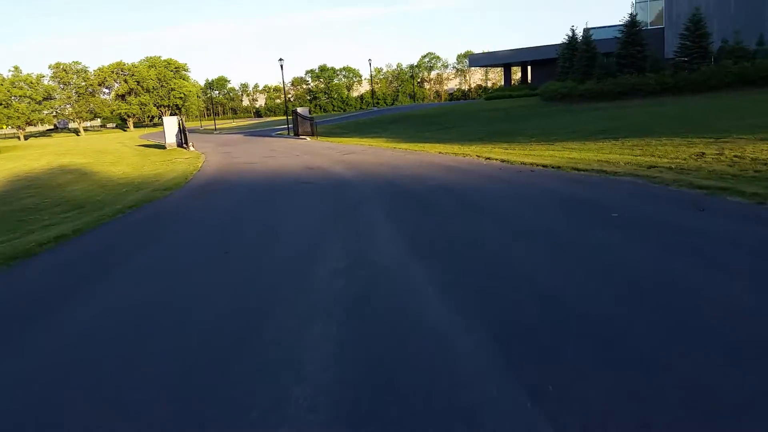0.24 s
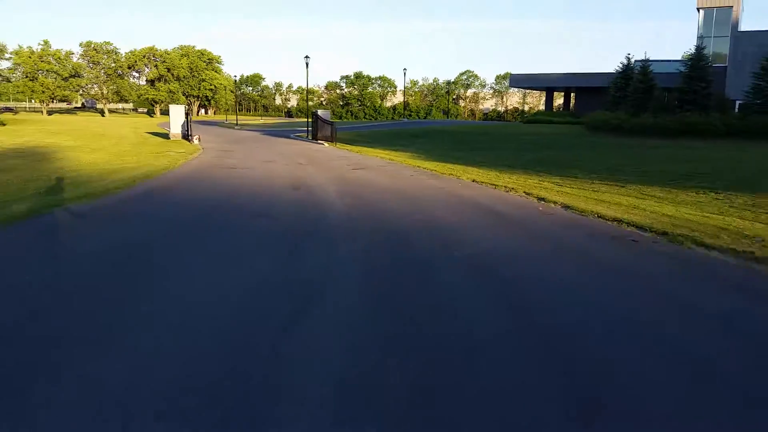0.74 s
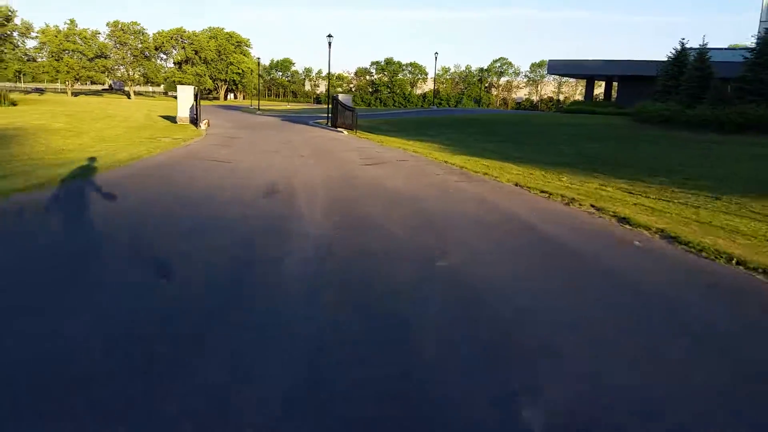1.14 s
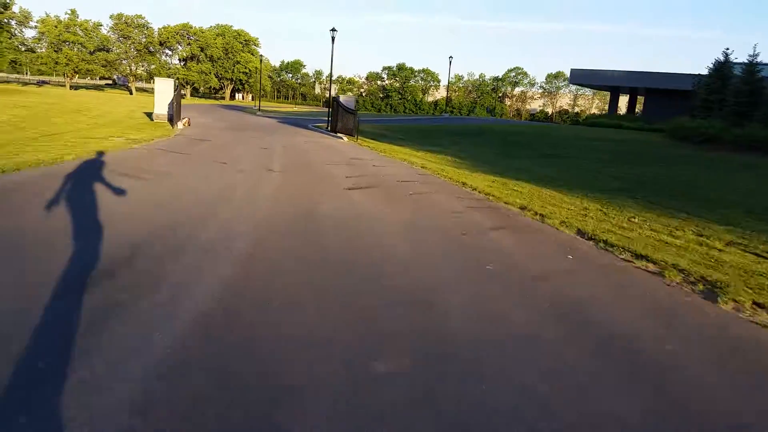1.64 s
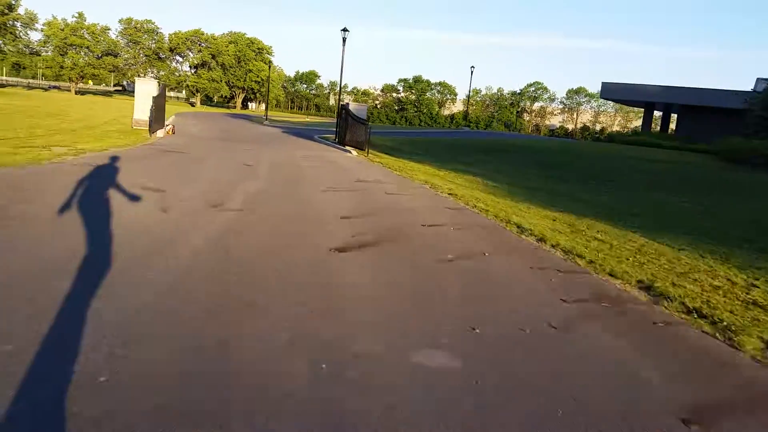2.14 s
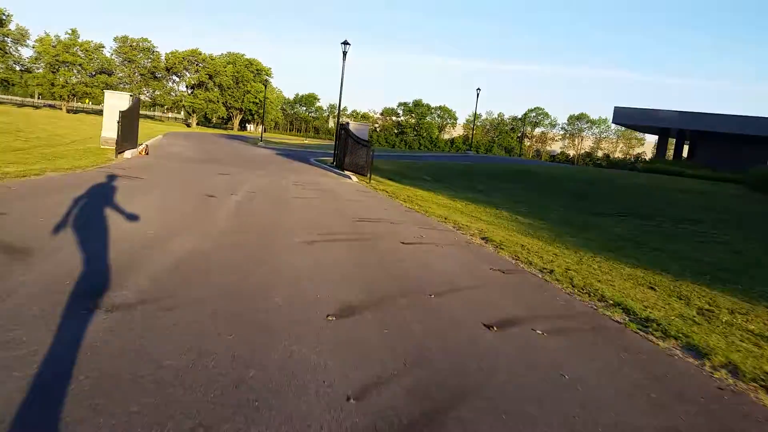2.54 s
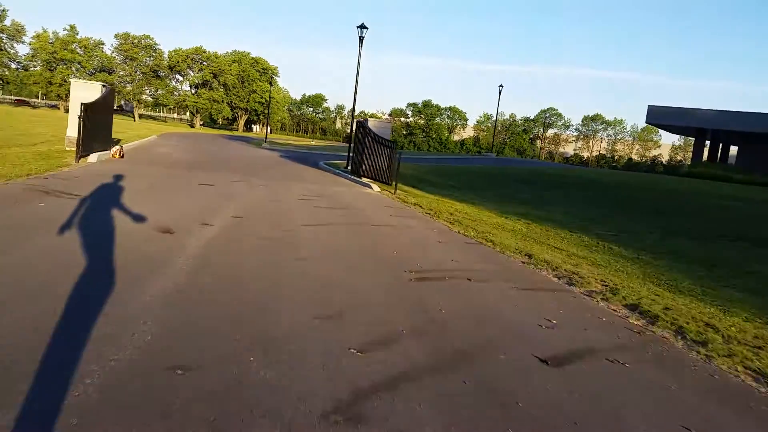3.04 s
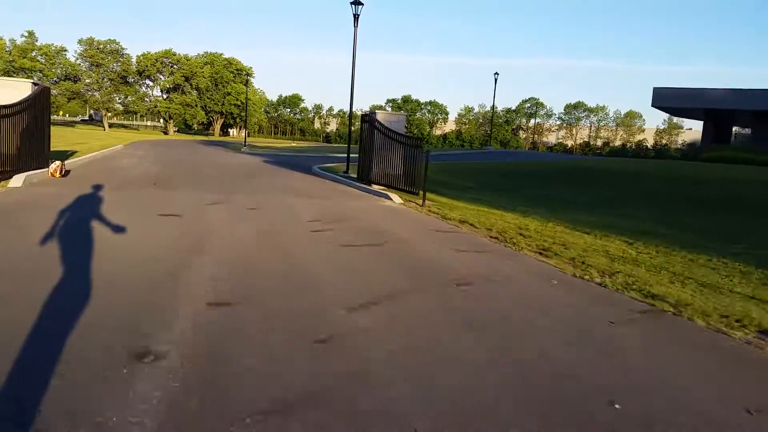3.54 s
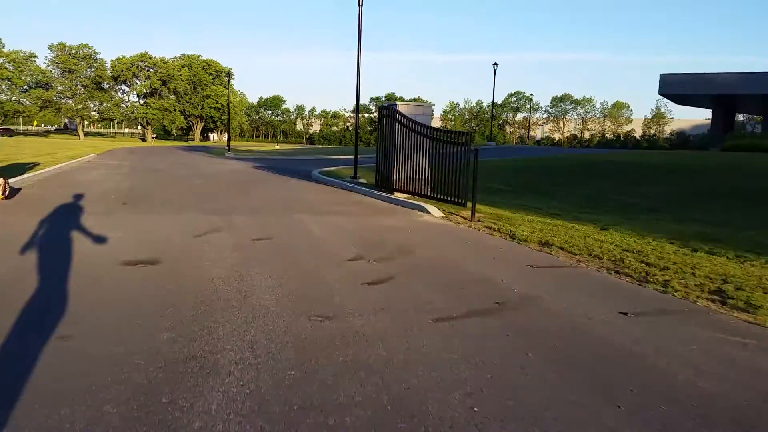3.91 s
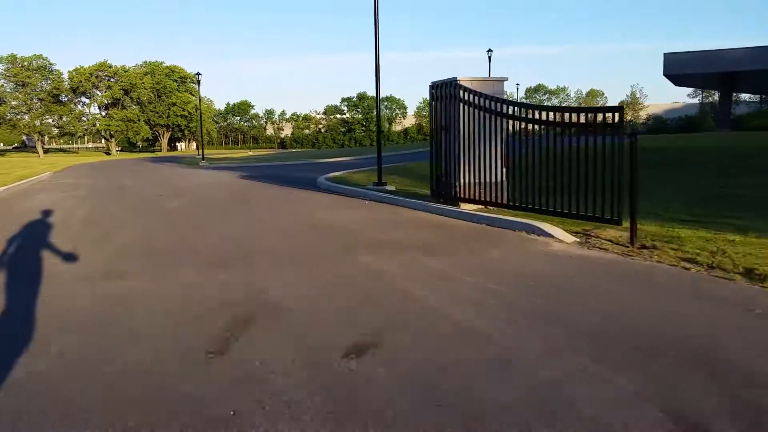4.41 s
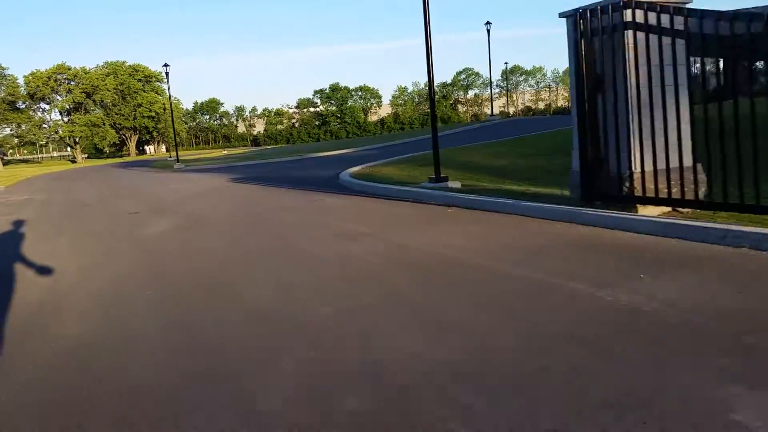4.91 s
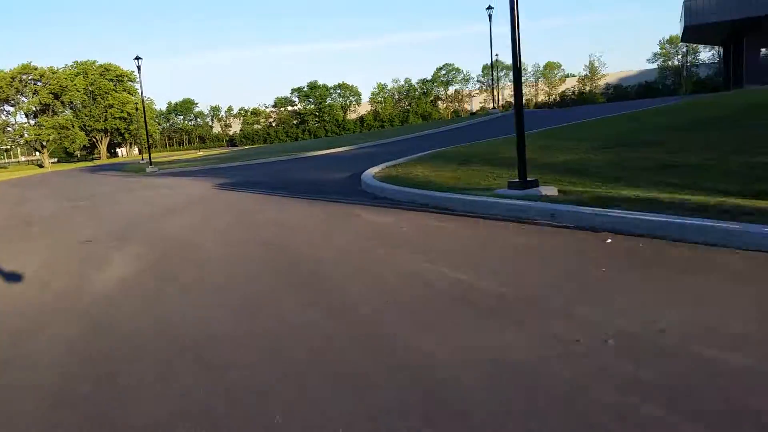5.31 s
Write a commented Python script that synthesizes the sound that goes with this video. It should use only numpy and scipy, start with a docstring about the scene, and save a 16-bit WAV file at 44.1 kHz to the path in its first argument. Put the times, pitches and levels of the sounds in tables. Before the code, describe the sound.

A longboard coasts along an outdoor asphalt drive, heard from a microphone carried by the rider. Loud wind dominates with low rumble, rasping gusts and crackling pops, shifting toward the left halfway and swelling near the end. The wheels make a continuous gritty roar underneath, with a hollow ring from the deck, easing slightly late on. A few faint, high bird whistles come in two small groups.

```python
"""A smooth asphalt drive: a longboard coasts down it, the rider carrying a camera.
Wind buffets both microphone ports, rasps in gusts, hisses over the rims, pops, and locks into deep
throbs and drones; the right port falls into the lee halfway. Underneath, the wheels roar and whine
on the grit and ring the deck. Birds whistle from the trees."""
import sys
import numpy as np
from scipy import signal
from scipy.fft import rfft, irfft, next_fast_len
from scipy.io import wavfile
from scipy.ndimage import uniform_filter1d, minimum_filter1d

SR = 44100
rng = np.random.default_rng(int(sys.argv[2]) if len(sys.argv) > 2 else 0)


def generate_wav(sig):
    """Save sig (samples, or channels by samples) to the path in sys.argv[1] as 16-bit PCM at SR."""
    pcm = np.round(np.clip(np.atleast_2d(sig).T, -1, 1) * 32767).astype(np.int16)
    wavfile.write(sys.argv[1], SR, pcm)


N = 245181
TIME_S = np.arange(N) / SR

# Headwind at the exposed left port: time_s, level_db
HEADWIND = [(0.0, -15), (0.75, -17), (0.9, -13.5), (1.4, -13.5), (2.15, -12), (2.32, -11), (2.5, -12.5),
            (2.8, -13), (3.25, -12), (3.55, -12.5), (4.0, -11), (4.12, -12.5), (4.28, -11.5), (4.42, -11),
            (4.62, -9.5), (4.92, -8), (5.22, -11), (5.42, -11), (5.56, -12)]
# Flow roughness, extra level of the small eddies: time_s, rasp_db
ROUGHNESS = [(0.0, -0.5), (0.7, -2), (0.98, 0), (1.2, -3), (1.45, -1), (1.5, 3), (1.65, 1.5), (2.42, 1.5),
             (2.75, -4), (3.05, -4), (3.4, -9.5), (4.3, -4.5), (4.9, -8), (5.25, -4.5), (5.56, -3.5)]
# Shelter of the right port, relative to the left: time_s, buffet_loss_db, rasp_gain_db
RIGHT_LEE = [(0.0, -1.5, -5), (1.75, -2, -5.5), (2.35, 0, -10), (2.47, 1.5, -10), (2.52, 3, -13.5),
             (2.75, 6.5, -5.5), (4.55, 10, -11.5), (5.08, 18, 0), (5.56, 10, -10)]
# Buffet spectrum per port: freq_hz, relative_density_db
WIND_SPECTRUM_LEFT = [(20, -23.5), (42, -17), (70, 0), (120, -2), (200, -7), (320, -12.5), (460, -14),
                      (650, -23), (1000, -24.5), (1500, -34.5), (2250, -38.5), (3000, -51), (4200, -62.5),
                      (5000, -72.5)]
WIND_SPECTRUM_RIGHT = [(20, -5), (42, -6.5), (70, -3.5), (120, -0.5), (220, -3.5), (320, -6.5), (460, -6),
                       (650, -15), (1000, -22.5), (1500, -28), (2200, -58), (3000, -69.5), (4200, -72.5),
                       (5500, -78)]
# Air over the rims, before port gains: time_s, level_db
HISS_LEVEL = [(0.04, -53.5), (0.38, -56), (1.38, -54), (1.98, -58.5), (2.21, -56), (2.46, -57.5),
              (2.52, -62.5), (2.7, -61), (2.73, -65.5), (3.76, -57), (3.79, -51.5), (3.82, -55.5),
              (4.51, -51), (4.74, -52), (4.8, -57.5), (5.22, -51.5), (5.56, -57)]
# Hiss spectrum with each port's resonances: freq_hz, relative_density_db
RIM_SPECTRUM_LEFT = [(1500, -8), (4200, -3), (5200, -11), (6100, -8.5), (6900, -7), (7700, 0), (8800, -7.5),
                     (10300, -8.5), (12200, -.5), (13500, -5.5), (15800, -4)]
RIM_SPECTRUM_RIGHT = [(1500, -3), (3200, -4), (5200, -15), (7700, -18), (9000, -25), (10300, -22),
                      (12200, -7.5), (13500, -6.5), (14500, -3), (15800, 5)]
# Wheel roar on asphalt: time_s, level_db
ROAR_LEVEL = [(0, -26.5), (1.3, -21.5), (2.3, -28), (2.7, -28.5), (4.2, -26.5), (5.0, -33.5), (5.56, -30.5)]
# Roar spectrum with deck resonances: freq_hz, relative_density_db
ROAR_SPECTRUM = [(70, -25), (135, 3.5), (220, -5.5), (330, -3.5), (432, -7), (560, -3), (700, -14.5),
                 (1120, -15), (1450, -26.5), (1900, -26.5), (2300, -24.5), (3000, -47.5), (4200, -42),
                 (5000, -55)]
# Hollow deck ring, varying with the surface: time_s, level_db
DECK_RING_LEVEL = [(0, -27), (.42, -32.5), (.6, -21), (1.0, -37.5), (1.28, -18.5), (1.5, -29.5),
                   (2.0, -28.5), (2.3, -27.5), (2.65, -31), (3.15, -27.5), (3.55, -32), (3.85, -27),
                   (4.25, -29), (4.55, -42), (5.05, -39), (5.25, -30.5), (5.56, -50)]
# Wheel whine, sinking in pitch, singing out in the turn: time_s, pitch_hz, level_db
WHEEL_WHINE = [(0, 1213, -46), (.55, 1125, -41.5), (1.6, 1054, -44), (2.7, 990, -54), (3.35, 924, -40),
               (4.1, 896, -38), (4.7, 930, -45), (5.56, 907, -59)]
# Higher ring in the turn: time_s, level_db
HIGH_RING_LEVEL = [(3.1, -75), (3.7, -59), (4.5, -53), (5.0, -70)]
# Strong eddy bursts: start_s, level_db, centre_hz, rattle_decay_s, left_minus_right_db
EDDY_BURSTS = [(0.161, -21, 900, .022, 22), (0.717, -33, 500, .003, 4), (0.85, -21, 650, .004, 20),
               (0.871, -26.5, 806, .004, -4), (.945, -17, 450, .004, -15), (1.019, -25, 700, .014, 14),
               (1.077, -27.5, 950, .005, 20), (1.287, -26.5, 900, .003, 24), (1.313, -19, 750, .006, 18),
               (1.488, -24, 850, .05, 20), (1.518, -27, 1250, .012, 14), (1.685, -29, 1200, .004, 16),
               (1.722, -21, 450, .003, -3), (1.771, -24, 950, .004, 22), (1.892, -33.5, 1000, .004, 16),
               (2.057, -26, 1200, .006, 21), (2.142, -23, 1300, .006, 19), (2.257, -26.5, 750, .004, 0),
               (2.347, -21, 900, .005, 20), (2.381, -23, 950, .016, 22), (2.428, -21, 900, .005, 20),
               (2.508, -27, 700, .003, 26), (2.541, -24, 950, .03, 24), (2.571, -23, 1050, .014, 23),
               (2.669, -21, 700, 0.022, 17), (2.845, -29, 650, .003, 14), (2.861, -27.5, 1090, 0.049, 22),
               (3.057, -24, 550, .003, 16), (3.095, -27, 500, .003, 15), (3.157, -25.5, 1000, .003, 28),
               (4.74, -21.5, 990, .003, 29), (4.752, -25, 700, .02, 28), (4.862, -19, 450, .005, 19),
               (4.902, -25, 500, .003, 17), (5.038, -16, 550, .003, 29), (5.07, -15, 430, .003, 25),
               (5.095, -24, 750, .003, 25), (5.102, -21, 1050, .005, 27), (5.135, -21, 600, .015, 23),
               (5.232, -37, 1100, .003, 24), (5.278, -27, 700, .004, 20), (5.418, -24, 850, .016, 28),
               (5.453, -37, 1050, .003, 27), (5.492, -23, 950, .005, 26), (5.502, -24.5, 1000, .025, 27)]
# Locked vortex shedding: start_s, length_s, start_hz, end_hz, peak_db, left_minus_right_db
VORTEX_TONES = [(.59, 0.099, 145.6, 135, -14, -1), (.85, 0.13, 133, 118.4, -19.5, 5.5),
                (.98, 0.14, 119.4, 136, -10, 14), (1.62, .14, 150, 137.6, -9, 12),
                (1.81, 0.082, 138, 143, -8.5, 9), (2.211, 0.2, 84.2, 55.4, -13.5, 11),
                (2.25, 0.11, 99.7, 114, -13, 2.5), (2.53, 0.12, 139.4, 123.4, -12, 9),
                (2.605, 0.19, 73.7, 76.7, -9.5, 22), (2.834, 0.17, 85, 94, -12, 19),
                (3.8, 0.28, 90.9, 127.6, -12.5, 17), (4.56, 0.1, 164.3, 145, -16, 20),
                (4.559, 0.25, 93.3, 85.9, -11.5, 24), (4.739, 0.437, 79.8, 69, -10.5, 24),
                (5.328, 0.16, 107, 114.4, -15.5, 16), (5.417, 0.19, 78, 74.6, -13, 24)]
# Bird whistles: start_s, length_s, start_hz, middle_hz, end_hz, level_db, accent_fraction
BIRD_NOTES = [(0.703, .24, 3800, 3400, 3250, -67, .3), (0.763, .055, 4650, 4330, 4050, -56, .55),
              (0.798, 0.36, 4080, 3500, 3200, -55, 0.64), (1.325, .04, 4250, 4100, 3980, -59, .5),
              (1.355, 0.109, 3990, 3780, 3700, -58, .4), (2.895, .06, 6800, 6550, 6500, -73, 0.6),
              (3.02, .135, 5300, 4900, 4880, -64.5, .6), (3.13, .105, 4880, 4940, 5120, -60, 0.3),
              (3.594, .07, 4200, 3880, 3680, -60, 0.2)]


def from_db(db):
    """Decibels to gain."""
    return 10 ** (np.asarray(db) / 20)


def unit_rms(x):
    """Scale to rms 1."""
    return x / np.sqrt(np.mean(x ** 2) + 1e-20)


def curves(table):
    """Value columns of a time table, interpolated per sample."""
    time_s, *columns = np.transpose(table)
    return [np.interp(TIME_S, time_s, column) for column in columns]


def pan_gains(pan_db):
    """Left and right gains of mean 1 for a level difference."""
    gains = from_db([[pan_db / 2], [-pan_db / 2]])
    return gains / gains.mean()


def drift(rate_hz):
    """Smooth random motion, rms 1, turning at roughly rate_hz."""
    pole = np.exp(-16 * np.pi * rate_hz / SR)
    slow = signal.lfilter([1], [1, -2 * pole, pole * pole], rng.standard_normal(N // 8 + 4002))[4000:]
    return np.interp(np.arange(N) / 8, np.arange(len(slow)), unit_rms(slow))


def lowpass(x, cutoff_hz, order):
    """Butterworth low-pass."""
    return signal.sosfilt(signal.butter(order, cutoff_hz, fs=SR, output="sos"), x)


def coloured(noise, spectrum, share=lambda hz: 1):
    """Shape white noise to a unit-power spectrum; keep share(hz) of the power."""
    size = next_fast_len(N)
    hz = np.maximum(np.arange(size // 2 + 1) * SR / size, 1)
    knots_hz, knots_db = np.transpose(spectrum)
    skirts = np.minimum(hz / knots_hz[0], 1) ** 2 * np.minimum(knots_hz[-1] / hz, 1) ** 4
    gain = unit_rms(from_db(np.interp(np.log(hz), np.log(knots_hz), knots_db)) * skirts)
    return irfft(rfft(noise, size) * gain * np.sqrt(share(hz)), size)[:N]


def resonance(drive, centre_hz, width_hz):
    """Resonance with a moving centre, rms 1."""
    carrier = np.exp(2j * np.pi * np.cumsum(centre_hz) / SR)
    baseband = lowpass(drive * carrier.conj(), width_hz / 2, order=2)
    return unit_rms((baseband * carrier).real)


def port_flows():
    """(level_db, rasp_db) at the left and right port: one headwind, weaker in the lee."""
    level_db, = curves(HEADWIND)
    rasp_db, = curves(ROUGHNESS)
    loss_db, rasp_gain_db = curves(RIGHT_LEE)
    return (level_db, rasp_db), (level_db - loss_db, rasp_db + rasp_gain_db)


def wind_buffet(flow, spectrum, burst_db, eddy_hz, bass_swell):
    """Turbulence on one port: big eddies push steadily, small ones tear off in bursts."""
    level_db, rasp_db = flow
    eddies = 0.59 * drift(eddy_hz) + .5 * drift(18.0)
    burst_scale = np.clip(1.9 + .012 * rasp_db, .3, 1.6)
    zones_hz = [75, 150, 420, 1300, 3500]
    burst_depths = [0.041, 0.2, 0.39, 0.97, 1.1]
    extras_db = [bass_swell * (level_db - level_db.mean()), 0, rasp_db / 2, rasp_db, 1.44 * rasp_db]
    out = 0
    for extra_db, depth, zone in zip(extras_db, burst_depths, np.eye(len(zones_hz))):
        bursts = from_db(depth * burst_db * burst_scale * eddies)
        noise = rng.standard_normal(N) * bursts
        push = coloured(noise, spectrum, lambda hz: np.interp(np.log(hz), np.log(zones_hz), zone))
        # Over 1/6 s the flow alone sets the level.
        power = uniform_filter1d(push ** 2, SR // 6)
        levelled = push / np.sqrt(power / power.mean() * np.mean(bursts ** 2))
        out = out + levelled * from_db(level_db + extra_db)
    return out


def rim_hiss(left_db, right_db, flutter_db, flutter_hz, waver_db, waver_hz):
    """Air slides over the rims: hiss flutters per port, wavers on both together."""
    level_db, = curves(HISS_LEVEL)
    ports = []
    for spectrum in (RIM_SPECTRUM_LEFT, RIM_SPECTRUM_RIGHT):
        noise = rng.standard_normal(N) * from_db(flutter_db * drift(flutter_hz))
        ports.append(coloured(unit_rms(noise), spectrum))
    envelope = from_db(level_db + waver_db * drift(waver_hz))
    return np.array(ports) * envelope * from_db([[left_db], [right_db]])


def grit(stones_per_s, spread_db):
    """Stones of uneven size pass under the wheels, one impulse each."""
    sizes = from_db(spread_db * np.minimum(rng.exponential(1, N), 4)) * rng.choice([-1, 1], N)
    return unit_rms(sizes * (rng.random(N) < stones_per_s / SR))


def deck_ring(drive, pitch_hz, sag_hz_per_s, wander_hz):
    """Hollow ring of the deck, bending as it flexes."""
    centre_hz = pitch_hz - sag_hz_per_s * TIME_S + wander_hz * drift(rate_hz=2.6)
    return resonance(drive, centre_hz, width_hz=83.5) * from_db(curves(DECK_RING_LEVEL))


def wheels(lag_s, shadow_hz):
    """Grit drives deck and wheels; the right port hears it later, shadowed by the camera body."""
    direct = grit(stones_per_s=5000, spread_db=-1.5)
    shadowed = lowpass(np.interp(TIME_S - lag_s, TIME_S, direct), shadow_hz, order=1)
    scatter = rng.standard_normal((2, N)) / [[2.5], [4]]
    drive = np.array([direct, shadowed]) + scatter
    roar = np.array([coloured(port, ROAR_SPECTRUM) for port in drive]) * from_db(curves(ROAR_LEVEL))
    hollow = deck_ring(drive, pitch_hz=440, sag_hz_per_s=4, wander_hz=23.4)
    whine_hz, whine_db = curves(WHEEL_WHINE)
    whine = resonance(drive, whine_hz, width_hz=120) * from_db(whine_db)
    high_ring = resonance(drive, centre_hz=np.full(N, 2400), width_hz=650)
    return roar + hollow + whine + high_ring * from_db(curves(HIGH_RING_LEVEL))


def port_response(spikes, centre_hz, edge_ratio=1.63, top_hz=3070):
    """A port dulls pressure spikes to a band around centre_hz."""
    edges_hz = [centre_hz / edge_ratio, centre_hz * edge_ratio]
    band = signal.sosfilt(signal.butter(2, edges_hz, "band", fs=SR, output="sos"), spikes + 1e-18)
    return lowpass(band, top_hz, order=4)


def small_pops(flow, pops_per_s=22, centre_hz=570, offset_db=-4, spread_db=0.5):
    """Lesser eddies burst at random, louder in stronger, rougher flow."""
    level_db, rasp_db = flow
    peaks_db = level_db + rasp_db + offset_db + spread_db * np.minimum(rng.exponential(1, N), 2)
    spikes = from_db(peaks_db) * rng.choice([-1, 1], N) * (rng.random(N) < pops_per_s / SR)
    impulse_peak = np.abs(port_response(TIME_S == 0, centre_hz)).max()
    return port_response(spikes, centre_hz) / impulse_peak


def strong_pops(turn_s, crackle_decay_s, level_window_s):
    """A strong eddy bursts on a port: a crackling spike, repeated weaker on its next two turns."""
    out = np.zeros((2, N))
    age_s = TIME_S[:SR // 10]
    for start_s, level_db, centre_hz, rattle_decay_s, pan_db in EDDY_BURSTS:
        gains = pan_gains(pan_db)
        for turn, noise in enumerate(rng.standard_normal((3, len(age_s)))):
            crackle = noise * np.exp(-age_s / crackle_decay_s) / 5
            spike = port_response((age_s == 0) + crackle, centre_hz)
            spike *= np.sqrt(level_window_s * SR) / np.linalg.norm(spike)
            delay_s = turn * turn_s
            spike *= from_db(level_db) * np.exp(-delay_s / rattle_decay_s)
            onset = int((start_s + delay_s) * SR)
            out[:, onset:onset + len(age_s)] += gains / gains.max() * spike[:N - onset]
    return out


def vortex_drones(detune_fraction, shake_db, unsteady_hz):
    """Near-regular vortex shedding presses on the ports: deep, unsteady tones that swell and die."""
    out = np.zeros((2, N))
    detune = 1 + detune_fraction * drift(unsteady_hz)
    wobble_db = shake_db * drift(unsteady_hz)
    for start_s, length_s, start_hz, end_hz, peak_db, pan_db in VORTEX_TONES:
        on = (TIME_S > start_s) & (TIME_S < start_s + length_s)
        progress = (TIME_S[on] - start_s) / length_s
        pitch_hz = (start_hz + (end_hz - start_hz) * progress) * detune[on]
        phase = 2 * np.pi * np.cumsum(pitch_hz) / SR
        envelope = from_db(peak_db + wobble_db[on]) * np.sin(np.pi * progress)
        gains = pan_gains(pan_db)
        out[:, on] += gains / gains.max() * envelope * np.sin(phase)
    return out


def birds(warble_db, pan_db):
    """Pure whistles from the trees, each gliding along an arc and swelling to its accent."""
    out = np.zeros(N)
    unsteady = drift(rate_hz=60)
    for start_s, length_s, start_hz, middle_hz, end_hz, level_db, accent in BIRD_NOTES:
        on = (TIME_S > start_s) & (TIME_S < start_s + length_s)
        progress = (TIME_S[on] - start_s) / length_s
        arc_hz = (2 * middle_hz - start_hz - end_hz) * 2 * progress * (1 - progress)
        pitch_hz = start_hz + (end_hz - start_hz) * progress + arc_hz
        phase = 2 * np.pi * np.cumsum(pitch_hz * (1 + 0.0012 * unsteady[on])) / SR
        swell = np.sin(np.interp(progress, [0, np.clip(accent, .1, .9), 1], [0, np.pi / 2, np.pi]))
        out[on] += from_db(level_db + warble_db * unsteady[on]) * swell * np.sin(phase)
    return (out + tree_echo(out, level_db=-9, t60_s=.25)) * pan_gains(pan_db)


def tree_echo(source, level_db, t60_s):
    """Trees scatter a short diffuse echo, different on each side."""
    age_s = TIME_S[:SR // 3]
    tails = rng.standard_normal((2, len(age_s))) * from_db(-60 * age_s / t60_s)
    echoes = [signal.fftconvolve(source, tail / np.linalg.norm(tail))[:N] for tail in tails]
    return from_db(level_db) * np.array(echoes)


def scene():
    """Wind, wheels and birds at the two ports."""
    left_flow, right_flow = port_flows()
    left = wind_buffet(left_flow, WIND_SPECTRUM_LEFT, burst_db=3.0, eddy_hz=130, bass_swell=0.085)
    left += small_pops(left_flow)
    right = wind_buffet(right_flow, WIND_SPECTRUM_RIGHT, burst_db=5.5, eddy_hz=110, bass_swell=-0.17)
    right += small_pops(right_flow)
    hiss = rim_hiss(left_db=2.0, right_db=4.5, flutter_db=2.0, flutter_hz=220, waver_db=1.0, waver_hz=14)
    drones = vortex_drones(detune_fraction=0.034, shake_db=1.2, unsteady_hz=17)
    pops = strong_pops(turn_s=.0102, crackle_decay_s=.003, level_window_s=.003)
    wind = np.array([left, right]) + hiss + pops + drones
    return wind + wheels(lag_s=.00008, shadow_hz=710) + birds(warble_db=1, pan_db=5)


def record(dry):
    """Fast limiter on each port, then a steep low-pass."""
    ceiling, window_samples, cutoff_hz = .93, SR // 100, 15800
    needed_gain = np.minimum(1, ceiling / (np.abs(dry) + 1e-9))
    gain = uniform_filter1d(minimum_filter1d(needed_gain, window_samples), window_samples)
    return signal.sosfilt(signal.ellip(12, .1, 90, cutoff_hz, fs=SR, output="sos"), dry * gain)


dry = scene()
out = record(dry)
generate_wav(out)
```